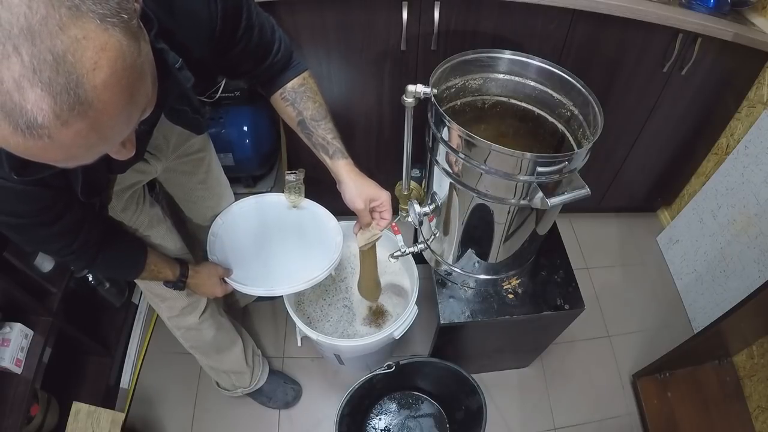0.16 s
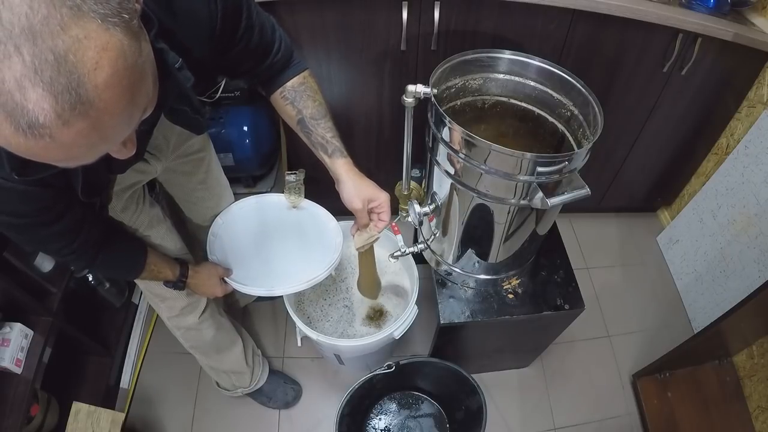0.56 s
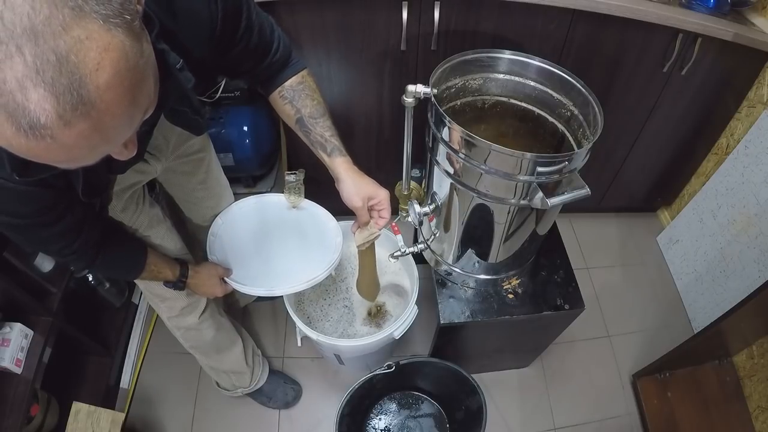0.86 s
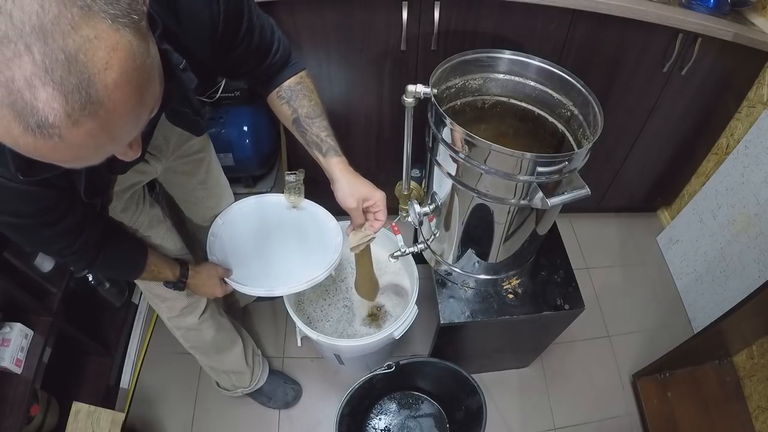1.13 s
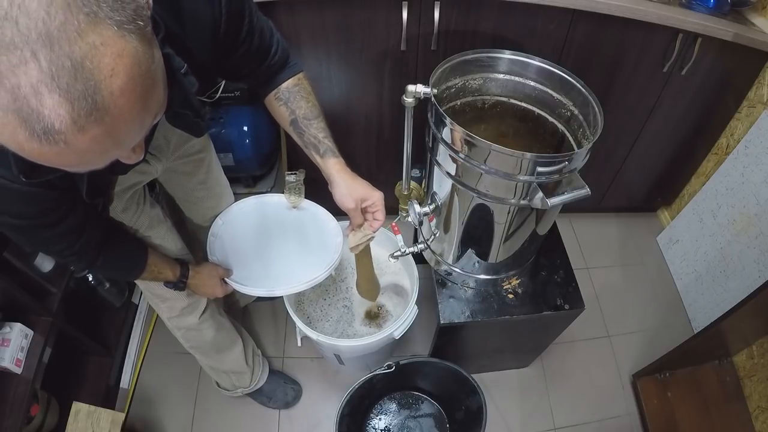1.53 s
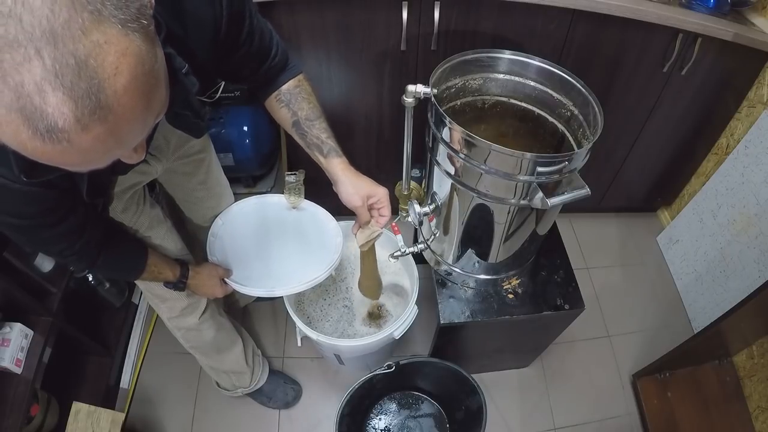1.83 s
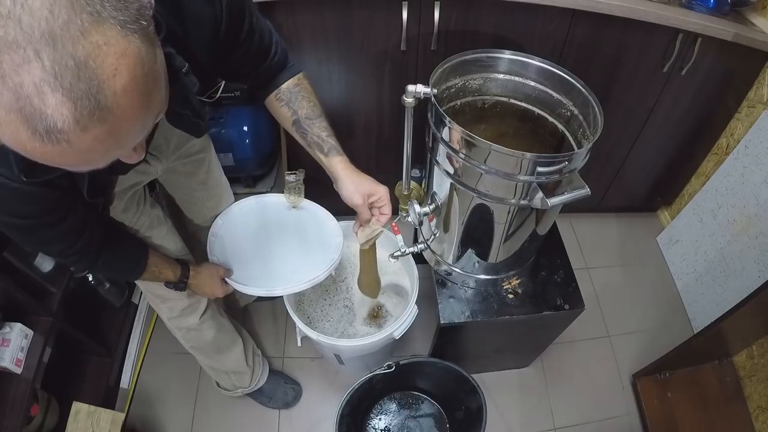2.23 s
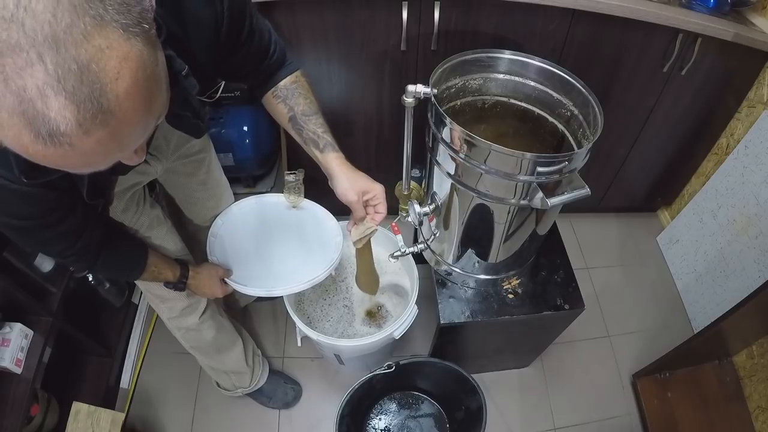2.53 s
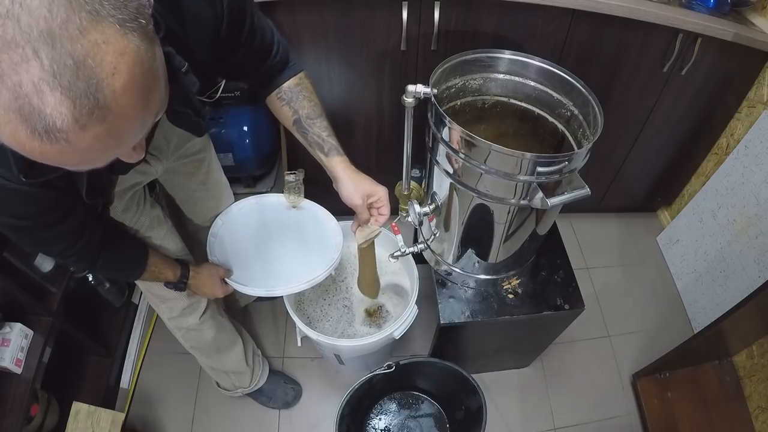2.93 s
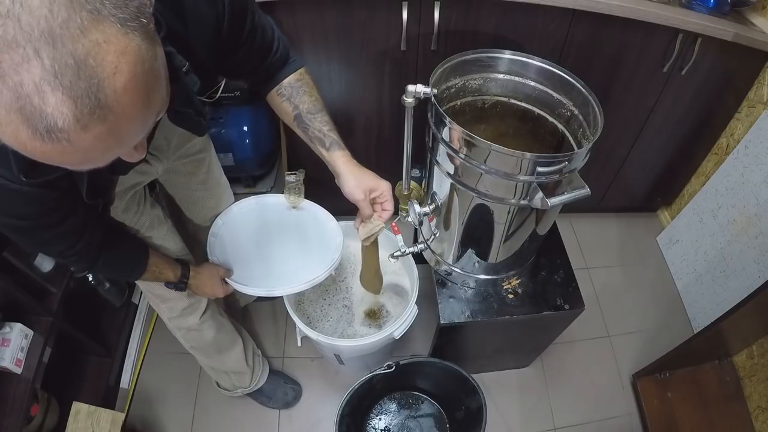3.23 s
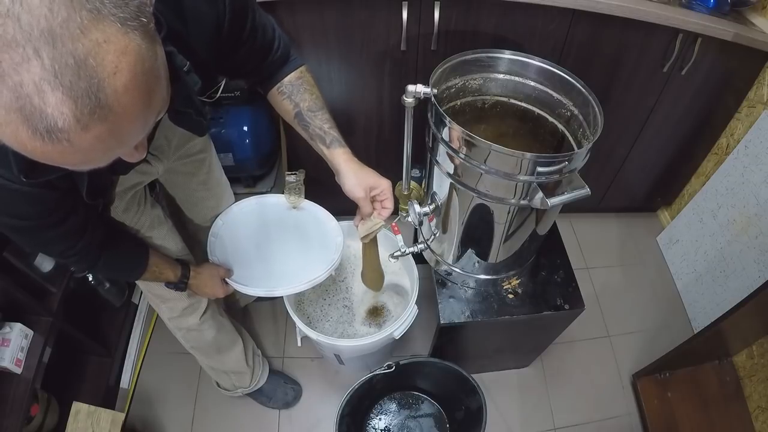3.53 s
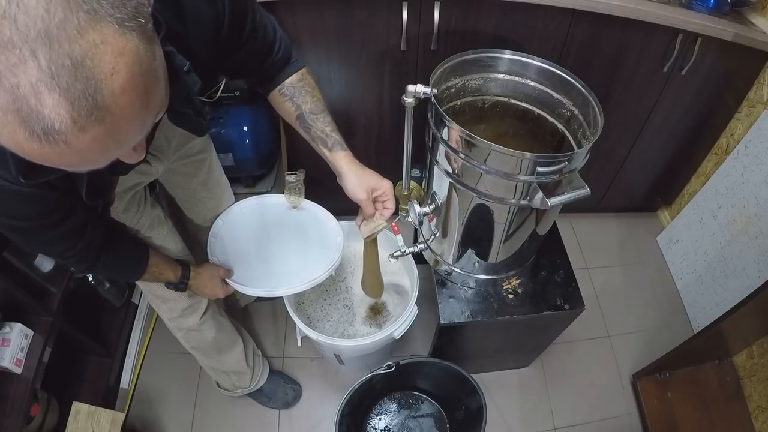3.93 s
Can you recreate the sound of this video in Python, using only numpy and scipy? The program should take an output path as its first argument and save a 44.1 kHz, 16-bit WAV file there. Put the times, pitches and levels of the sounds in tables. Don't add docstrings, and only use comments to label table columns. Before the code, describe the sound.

In a tiled home kitchen, liquid drips into a bucket: high glassy plips, lower hollow bloops and crisp spray ticks at uneven spacing. A faint fizzing trickle swells and thins beneath. A soft double shoe thump with a brief scuff comes in the first second, then only drops, with a busy strong cluster past the midpoint. Nearby stereo pickup, slim bass, short bucket and room echo, constant low noise.

```python
import sys
import numpy as np
from scipy import signal
from scipy.fft import rfft, irfft
from scipy.io import wavfile

SR = 44100
rng = np.random.default_rng(int(sys.argv[2]) if len(sys.argv) > 2 else 0)


def how_loud(loudness_db):
    steps = np.asarray(loudness_db, float) / 20
    return 10 ** steps


def pcm_store(signal):
    levels = np.round(np.clip(np.atleast_2d(signal), -1, 1) * 32767)
    wavfile.write(sys.argv[1], SR, levels.astype(np.int16).T)


N = 179284

# hz [Hz], gain_db [dB]
HOUSING_COLOUR = [(300, -20), (900, -12), (2000, 11.5), (3400, 17.5), (4800, 18), (7200, 11.5), (9500, 16),
                  (15000, -20)]
# hz [Hz], side_re_mid_db [dB]
PORT_DIFFERENCE = [(60, -3), (110, -2), (200, 1), (380, -5), (700, -0.5), (1290, -3.5), (2380, -4),
                   (4400, -10), (8120, 1.5), (15000, -3)]


def curve(rows):
    s, *columns = np.transpose(rows)
    return [np.interp(np.arange(N) / SR, s, c) for c in columns]


def at_hz(points, hz):
    points_hz, points_db = np.transpose(points)
    return np.interp(np.log(hz + 1e-9), np.log(points_hz), points_db)


def colour(x, points, turn=1):
    size = x.shape[-1]
    gain = how_loud(at_hz(points, np.fft.rfftfreq(size, 1 / SR)))
    return irfft(rfft(x) * turn * gain, size)


def high_pass(x, order, hz):
    return signal.sosfilt(signal.butter(order, hz, "high", fs=SR, output="sos"), x)


def rms_one(x):
    return x / np.sqrt(np.mean(x ** 2) + 1e-20)


def drift(rate_hz):
    knots = rng.standard_normal(400)
    return np.interp(np.arange(N) / SR * rate_hz, np.arange(400), knots)


def add(out, at_s, sound):
    i = max(int(at_s * SR), 0)
    out[i:i + len(sound)] += sound[:N - i]


def bubble(hz, cycles, glide, phase):
    turns = np.arange(int(3 * SR * max(cycles, 2) / hz)) / SR * hz
    life = turns / max(cycles, .8)
    shape = (1 - np.exp(-turns / 0.76)) * np.exp(-2.2 * life)
    rising = turns * (1 + glide * (life - .4))
    return shape / shape.max() * np.sin(2 * np.pi * rising + phase)


def drops(rows):
    # pitch_hz [Hz], send_re_direct_db [dB]
    wall_send = [(800, -4), (1300, -2.5), (2200, -3.5), (3000, -7), (3600, -4.5), (4500, -7), (7000, 3)]
    strong_slope_db_per_db, long_db_per_decade = -0.23, -6.5
    direct, sent = np.zeros((2, N))
    for (s, db, hz, cycles), luck in zip(rows, rng.random((len(rows), 2))):
        note = how_loud(db - 3.0) * bubble(hz, cycles, 0.0043 + 0.079 * luck[0], 2 * np.pi * luck[1])
        send_db = at_hz(wall_send, hz) + strong_slope_db_per_db * (db + 44.5)
        send_db += long_db_per_decade * np.log10(max(cycles, 1) / 10)
        add(direct, s, note)
        add(sent, s, note * how_loud(send_db + 11.5))
    return np.array([direct, sent])


def all_drops():
    # start_s [s], peak_db [dB], pitch_hz [Hz], ring_cycles [cycles]; large to small
    largest = [(.073, -37.5, 902, 16), (.026, -49.5, 920, 25), (.49, -45, 727, 28), (.706, -43, 892, 6.2),
               (.952, -46.5, 934, 2.1), (1.487, -44, 1110, 7.9), (1.955, -38.5, 947, 6.7),
               (2.287, -38.5, 758, 15), (2.371, -45, 990, 4.3), (2.416, -48, 870, 8.8),
               (2.588, -40.5, 1040, 23), (2.631, -38.5, 813, 24), (2.685, -45, 794, 16),
               (2.974, -36.5, 870, 8.9), (3.049, -27.5, 990, 7.6), (3.317, -45, 862, 12),
               (3.381, -57, 690, 17), (3.432, -51.5, 1110, 22), (3.97, -38, 863, 12.7)]
    large = [(0.056, -39, 1080, 7.1), (0.1937, -38, 1466, 13), (0.4424, -50, 1150, 12),
             (0.707, -50, 1337, 32), (0.879, -48, 1460, 14), (1.0148, -43, 1296, 38),
             (1.204, -36.5, 1390, 12), (1.3116, -40, 1367, 17), (1.7432, -40, 1300, 8.8),
             (2.2865, -34.5, 1340, 4.4), (2.5401, -46.5, 1110, 4.9), (2.591, -34, 1165, 12),
             (2.6268, -40, 1200, 11), (2.6774, -38, 1264, 9.2), (2.7437, -48, 1407, 16),
             (3.0713, -40.5, 1370, 2.1), (3.771, -47, 1410, 9.2), (3.83, -44, 1276, 28)]
    middle = [(.121, -47.5, 1990, 24), (0.707, -45, 1705, 26), (0.852, -38, 1880, 4.2),
              (1.0164, -44, 1860, 16), (1.0763, -36.5, 1570, 1.7), (1.203, -40, 1600, 2.5),
              (1.247, -39, 1820, 6.1), (1.51, -35.5, 2000, 2.6), (1.621, -48, 1480, 14),
              (1.698, -40, 1880, 8.3), (1.7445, -41, 1650, 3.4), (1.977, -49, 1610, 7),
              (2.107, -47, 1670, 6.4), (2.114, -38.5, 1806, 8.4), (2.542, -42.5, 1890, 15),
              (2.5893, -25, 1650, 2.7), (2.6773, -42, 1510, 4), (2.777, -44, 1870, 5.6),
              (3.252, -38.5, 1900, 5.7), (3.701, -40.5, 1670, 3), (3.7287, -37, 1970, 4.1)]
    medium = [(.002, -32.5, 2800, 1.1), (.6295, -42, 2120, 8), (0.8903, -40.5, 2220, 4.6),
              (1.0189, -26.5, 3005, 27), (1.077, -37.5, 2720, 8.8), (1.3127, -34, 2065, 12.5),
              (1.354, -35.5, 2840, 4.8), (1.745, -39.5, 2900, 15), (1.9091, -40, 2870, 5.2),
              (1.9597, -40.5, 2320, 7.9), (1.9952, -37, 1990, 2.7), (2.105, -35.5, 2300, 1),
              (2.3117, -35.5, 2780, 31), (2.468, -49.5, 2420, 12), (2.5893, -22.5, 2380, 4.8),
              (2.745, -25, 3110, 5.4), (2.945, -38.5, 2900, 10), (2.9872, -31, 2790, 15),
              (3.1052, -36.5, 2890, 8.2), (3.253, -39.5, 2670, 15), (3.3264, -34.5, 2840, 2),
              (3.4205, -44.5, 2930, 22), (3.6205, -38, 2860, 4.5), (3.658, -45, 2490, 12),
              (3.675, -34, 3120, 12), (3.7714, -40.5, 2330, 4.3)]
    little = [(.04, -33.5, 3410, 6.4), (.1955, -32, 4280, 15), (.2034, -26, 3400, 11),
              (0.5337, -36.5, 3750, 19), (.8515, -36.5, 3430, 34), (1.015, -27.5, 3570, 15),
              (1.1857, -40.5, 3500, 17), (1.245, -36, 3100, 9.9), (1.2481, -27, 3600, 11),
              (1.3117, -33, 3600, 3.4), (1.697, -43, 3560, 10), (1.822, -44, 3330, 7.1),
              (1.909, -36.5, 3680, 7.7), (2.072, -43, 3820, 4.7), (2.343, -42, 3480, 13),
              (2.5452, -38.5, 3900, 22), (2.6175, -22, 3550, 6.7), (2.7443, -24.5, 3760, 2.5),
              (2.9277, -32.5, 3350, 28), (2.9866, -32.5, 3230, 10), (3.152, -39.5, 3410, 39),
              (3.355, -27.5, 3390, 17), (3.6054, -37, 3410, 18), (3.6585, -34.5, 3500, 8.3),
              (3.8267, -29, 3350, 2.5), (3.959, -42, 3680, 14), (3.9647, -28.5, 3510, 17)]
    small = [(.4847, -38.5, 4220, 31), (0.5256, -34.5, 6550, 2), (0.971, -38.5, 4400, 7.7),
             (1.246, -22, 6530, 2.5), (1.507, -41.5, 5650, 8.8), (1.5529, -30, 4440, 2.9),
             (1.6232, -34, 4600, 4.5), (1.6235, -33.5, 5600, 2.7), (1.718, -33.5, 4450, 6.2),
             (1.9723, -31.5, 5300, 3.8), (2.149, -41, 4300, 7.2), (2.567, -29, 5810, 13),
             (2.616, -30.5, 6160, 1.8), (3.05, -32.5, 4430, 5.1), (3.101, -33, 5720, 19),
             (3.279, -32, 4500, 4.9), (3.2788, -30.5, 6550, 5.2), (3.3521, -26.5, 6330, 4.1),
             (3.5767, -37.5, 5960, 2.9), (3.634, -43, 6170, 7), (3.658, -33, 4270, 15),
             (3.8261, -27, 5930, 11), (3.9629, -34, 6340, 1.4)]
    smallest = [(.002, -38, 6800, 3.1), (0.152, -46, 6800, 8.2), (0.206, -35.5, 7200, 3.5),
                (0.6985, -42.5, 7350, 8.2), (.715, -40.5, 7660, 6.1), (.852, -40, 7650, 9),
                (0.888, -34.5, 7240, 4.4), (0.969, -39.5, 6900, 13), (1.015, -36, 7240, 6.6),
                (1.186, -43, 7130, 7.1), (1.2052, -33, 6400, 1.7), (1.3127, -31, 7000, 4.9),
                (1.418, -37.5, 6780, 9.5), (1.561, -39, 7260, 7), (1.589, -34, 6900, 9.1),
                (1.697, -31.5, 6600, 4.5), (1.9261, -27, 7540, 9.2), (2.0026, -34.5, 7300, 11),
                (2.1054, -32.5, 7170, 7.2), (3.827, -25, 7100, 10), (2.339, -32.5, 7460, 11),
                (2.7444, -26, 7050, 2.7), (3.003, -30.5, 7000, 6.9), (3.05, -36, 6850, 5.9),
                (3.134, -35.5, 7270, 11), (3.2464, -41, 7650, 22), (3.3253, -31, 7450, 9.8),
                (3.675, -33, 7270, 9.6)]
    faint_low = [(0.0818, -52, 2100.0, 10.0), (0.1936, -33.5, 1497, 12), (0.3053, -53, 1090, 9.2),
                 (0.3332, -51, 736, 13), (0.3392, -55, 1200, 10.0), (0.3861, -51, 1310, 10.0),
                 (0.4051, -47, 1230, 7.7), (0.421, -48, 700, 8.6), (0.44, -54, 1600, 18),
                 (0.466, -49, 1610, 25), (0.4819, -46, 1086, 11), (0.505, -53, 1900, 8),
                 (0.53, -55, 1410, 8), (0.5687, -60, 1560.0, 8.4), (0.6306, -44.5, 1455, 11),
                 (0.8022, -54, 965, 9.2), (0.9119, -46, 2100, 8.2), (0.9668, -50, 1870, 13),
                 (1.2452, -42, 1255, 10.0), (1.5595, -45, 1770.0, 11), (1.5944, -57.0, 1900, 10.0),
                 (1.6223, -52, 1460, 13), (1.86, -65, 707, 11), (1.9127, -53, 1430, 10.0),
                 (1.9955, -46.5, 915, 8.4), (2.06, -61, 1040, 18), (2.0763, -59.0, 894, 10.0),
                 (2.16, -60, 1010, 15), (2.5552, -50.0, 1860, 13), (2.6839, -50, 810, 7.7),
                 (2.7428, -53, 1440, 10.0), (2.9493, -55, 1230.0, 11), (3.3763, -60, 1030, 10.0),
                 (3.4142, -50.5, 694, 16), (4.0568, -44, 880, 10.0)]
    faint_high = [(0.0349, -40.5, 7300, 8.0), (0.1696, -42, 3660, 14), (0.2444, -36, 3460, 6.6),
                  (0.887, -46.0, 3480.0, 8.0), (0.9129, -38, 7100, 5.9), (1.0466, -39, 2980, 8.0),
                  (1.1654, -53, 9620.0, 8.0), (1.5176, -47, 5300.0, 8.0), (1.6044, -43, 3400, 9.2),
                  (1.9466, -39, 4240.0, 8.0), (2.0833, -42, 4260, 8.0), (2.1461, -41, 2770, 8.8),
                  (2.2359, -46, 7150, 9.2), (2.3098, -43, 4760.0, 8.0), (2.8006, -50, 3470.0, 8.0),
                  (2.8974, -39, 4640.0, 7.3), (3.0291, -49, 7460.0, 8.0), (3.1738, -44, 4970, 8.0),
                  (3.5719, -46, 3430, 8.0), (3.6327, -47, 6220.0, 8.0), (3.7295, -41, 5640, 8.0),
                  (3.9999, -43, 3730.0, 8.0), (4.0568, -43, 3210.0, 8.0)]
    sizes = (largest, large, middle, medium, little, small, smallest, faint_low, faint_high)
    return sum(drops(rows) for rows in sizes)


def trickle(per_s, spread_db):
    flow = [
        (0.0, -52),
        (0.35, -58.5),
        (0.92, -53.5),
        (1.16, -54),
        (2.44, -58.5),
        (3.24, -52.5),
        (3.37, -60),
        (3.61, -57.5),
        (3.77, -51.5),
        (4.07, -52.5),
    ]
    level_db, = curve(flow)
    out, luck = np.zeros(N), rng.random((3000, 4))
    times = np.cumsum(-np.log(luck[:, 0] + 1e-9)) / per_s
    for s, (_, size, pitch, phase) in zip(times[times < N / SR], luck):
        hz = np.clip(3500 * 2 ** (3.8 * (pitch - .6)), 500, 14000)
        level = how_loud(-spread_db * np.log(size + .1))
        add(out, s, level * bubble(hz, 12, .06, 2 * np.pi * phase))
    return how_loud(level_db - 6.5) * rms_one(colour(out, HOUSING_COLOUR))


def kitchen(x):
    # hz [Hz], t60_s [s]
    room_t60 = [(300, 0.69), (1000, 0.24), (3000, 0.26), (7000, 0.24), (14000, 0.19)]
    # hz [Hz], level_db [dB]
    bucket_air = [(767, -23.5), (870, -28.5), (945, -20), (1124, -36), (1181, -24), (1268, -30),
                  (1332, -29), (1459, -39), (1734, -25), (2083, -24.5), (2401, -20), (2713, -21),
                  (2861, -24)]
    # delay_s [s], level_db [dB]
    wall_echoes = [
        (.0021, -11),
        (.0057, -14),
        (.0073, -15),
        (.0135, -18),
        (.0325, -25),
    ]
    bucket_t60_s, tail_db, tail_rise_s = 0.21, -27, 0.0036
    diffuse_s, first_density = .06, .04
    t, tails = np.arange(SR // 2) / SR, 0
    density = np.clip((t / diffuse_s) ** 2, first_density, 1)
    present = rng.standard_normal((2, len(t))) * (rng.random((2, len(t))) < density)
    white = present / np.sqrt(density)
    for low_hz in 125 * 2. ** np.arange(7):
        octave = signal.butter(2, [low_hz, 2 * low_hz], "band", fs=SR, output="sos")
        tails = tails + signal.sosfilt(octave, white) * how_loud(-60 * t / at_hz(room_t60, 2.0 * low_hz))
    for hz, db in bucket_air:
        tails += how_loud(db - 60 * t / bucket_t60_s) * np.sin(2 * np.pi * (hz * t + rng.random((2, 1))))
    tails = tails * how_loud(tail_db) * (1 - np.exp(-t / tail_rise_s))
    for s, db in wall_echoes:
        tails[:, round(s * SR)] += how_loud(db) * rng.choice([-1, 1], 2)
    mid, side = signal.fftconvolve(x[None], tails, axes=1)[:, :N]
    return np.array([mid, colour(side, PORT_DIFFERENCE, turn=1j)])


def hum(patchy_db):
    hum_spectrum = [(53, -53), (90, -111), (127, -5.5), (168, 3.5), (405, -6), (571, -11), (1240, -14.5),
                    (1900, -17), (3400, -24), (5010, -26), (7370, -17.5), (8380, -17.5), (12600, -32.5),
                    (15300, -34)]
    hum_side = [(60, 6), (200, 0.3), (700, 11), (2400, 3), (4400, -4.5), (8100, 2), (15000, -1)]
    whines = [(8104, -75), (8559, -80)]
    level_db, rumble = -52.5, (70, -28)
    mid, side = colour(rng.standard_normal((2, N)), [rumble] + list(hum_spectrum)[1:])
    gain = how_loud(level_db + patchy_db * drift(3.68)) / np.std(mid)
    t = np.arange(N) / SR
    whine = sum(how_loud(db + 3) * np.sin(2 * np.pi * hz * t) for hz, db in whines)
    return gain * np.array([mid, colour(side, hum_side)]) + whine * [[1], [.6]]


def impacts():
    hits = [(0.18, -42.5, 1.5), (0.8504, -33, -5), (0.889, -42.5, 4), (1.0124, -40, 1), (1.018, -42, 6),
            (1.245, -46.5, 9.5), (1.312, -47, 8), (1.4321, -46, -12), (1.559, -50, 4), (1.595, -40, -1),
            (1.7015, -29.5, -9), (1.97, -45, 3), (1.932, -47, -12), (2.0018, -50.5, 15.5),
            (2.288, -43, -0.5), (2.5675, -39, -3), (2.7442, -51, -4), (2.7477, -37, -10), (3.0007, -42, 2),
            (3.134, -36, -13), (3.5556, -47, 3), (3.6355, -41, -1), (3.656, -33, -12), (3.7529, -44, 4),
            (3.9676, -35, -0.5)]
    spray_hz, snap_hz, snap_db = 9600, 11400, 8
    ticks, spray = np.zeros((2, N))
    for (s, db, tick_db), flecks in zip(hits, rng.random((len(hits), 5, 3))):
        add(ticks, s, how_loud(db + tick_db) * np.array([1.]))
        for k, (late, pitch, phase) in enumerate(flecks):
            fleck = bubble(spray_hz * (.8 + .5 * pitch), 4.5, 0.042, 2 * np.pi * phase)
            add(spray, s + 0.0024 * k * late, how_loud(db - 12.5 - 0.92 * k) * fleck)
    snap = high_pass(ticks + 1e-18, 4, snap_hz)
    return colour(ticks, HOUSING_COLOUR) + spray, how_loud(snap_db) * snap


def shoe():
    slide = [
        (.27, -68),
        (.31, -62),
        (.36, -53.5),
        (.43, -63.5),
        (.49, -52.5),
        (.53, -54.5),
        (.6, -59),
        (.66, -61),
        (.72, -81),
    ]
    steps = [
        (.306, -28.5, 191, .005, 0.065),
        (.312, -38, 307, 0.0033, 0.054),
        (.549, -27.5, 180, 0.007, 0.13),
    ]
    # hz [Hz], width_hz [Hz], level_db [dB]
    slide_modes = [(717, 210, 0), (1090, 450, 4.5), (1600, 68, -6)]
    out, t = np.zeros(N), np.arange(8000) / SR
    sagging_s = t + 0.0018 * (1 - np.exp(-t / 0.0017))
    for s, db, hz, rise_s, t60_s in steps:
        shape = (1 - np.exp(-(t / rise_s) ** 2)) * how_loud(-60 * t / t60_s)
        add(out, s - .006, how_loud(db - 4.0) * shape / shape.max() * np.sin(2 * np.pi * hz * sagging_s))
    rub, grit = 0, rng.standard_normal(N) * how_loud(1.5 * drift(41.7))
    for hz, width_hz, db in slide_modes:
        r = np.exp(-np.pi * width_hz / SR)
        poles = [1, -2 * r * np.cos(2 * np.pi * hz / SR), r * r]
        rub = rub + how_loud(db) * rms_one(signal.lfilter([1, 0, -1], poles, grit))
    level_db, = curve(slide)
    return high_pass(out, 4, 120), how_loud(level_db - 1.5) * rms_one(rub)


def scene():
    direct, sent = all_drops()
    fine = trickle(per_s=400, spread_db=3.3)
    hits, snap = impacts()
    thumps, rub = shoe()
    room = hum(patchy_db=.6)
    near = direct + how_loud(-4) * fine + hits + snap + thumps + rub
    ports = np.array([near, how_loud(-20) * colour(near, PORT_DIFFERENCE, turn=1j)])
    to_walls = sent + fine + how_loud(5.5) * hits + how_loud(-15.0) * thumps + how_loud(-0.5) * rub
    mid, side = high_pass(ports + kitchen(to_walls), 6, 125) + room
    return np.array([mid + side, mid - side]) * how_loud(np.array([[-.4], [.4]]))


def roll_off(x):
    return signal.sosfilt(signal.butter(12, 15700, fs=SR, output="sos"), x)


def record(dry):
    top_cut = signal.cheby2(4, 14, 16050, fs=SR, output="sos")
    mix = signal.sosfilt(top_cut, dry)
    return roll_off(mix)


dry = scene()
out = record(dry)
pcm_store(out)
```